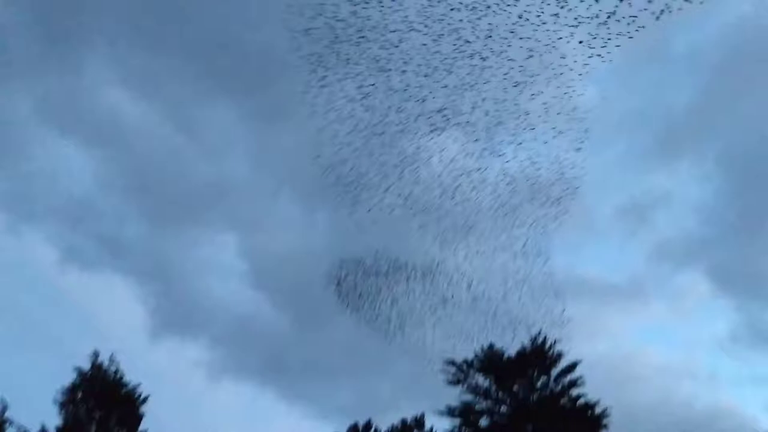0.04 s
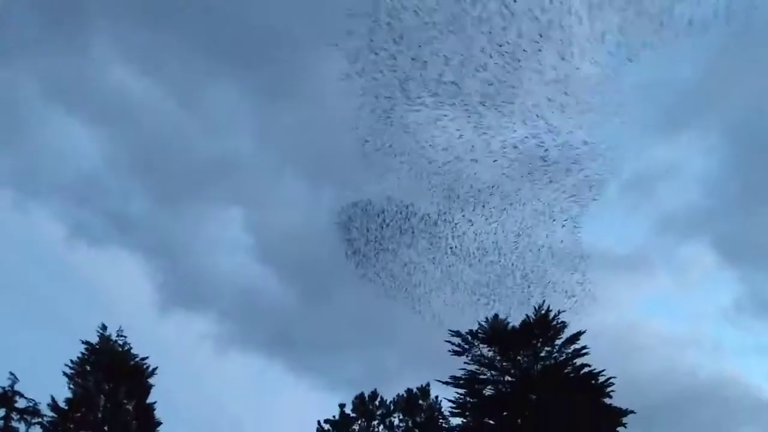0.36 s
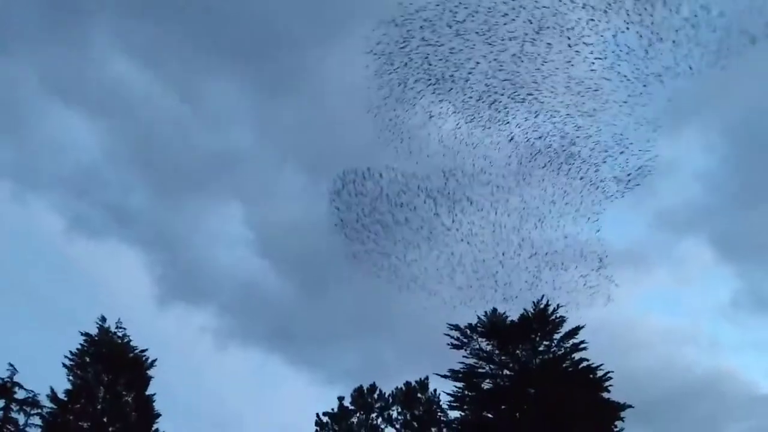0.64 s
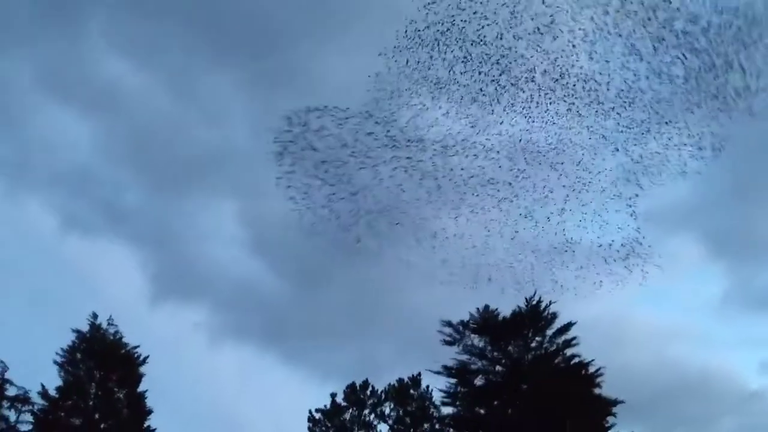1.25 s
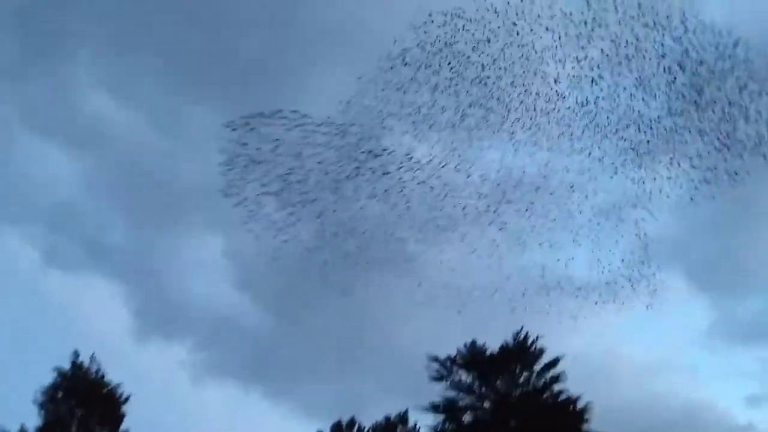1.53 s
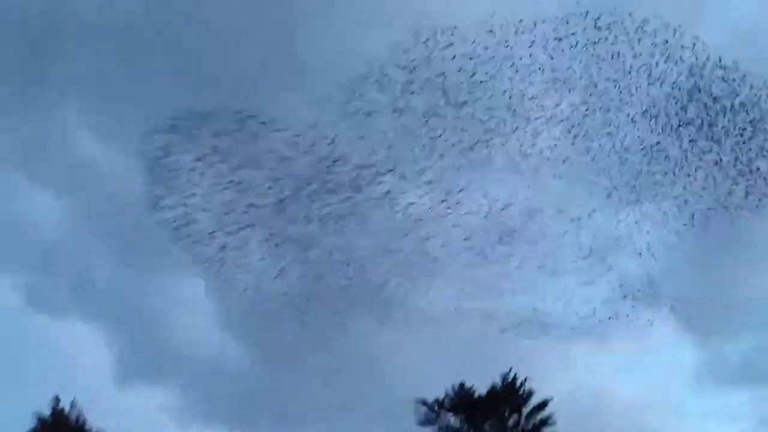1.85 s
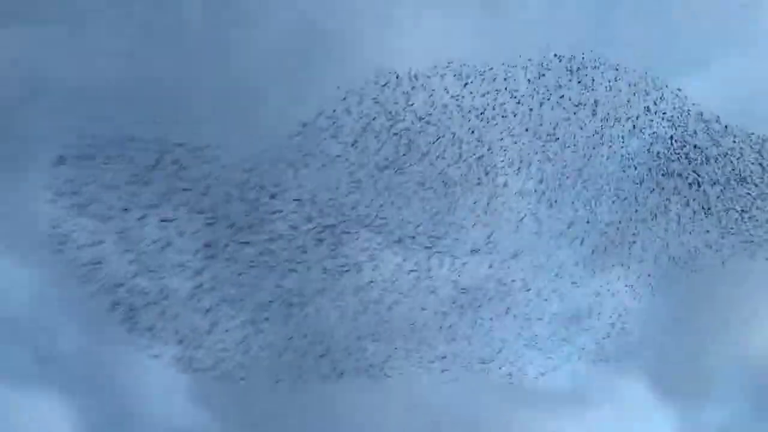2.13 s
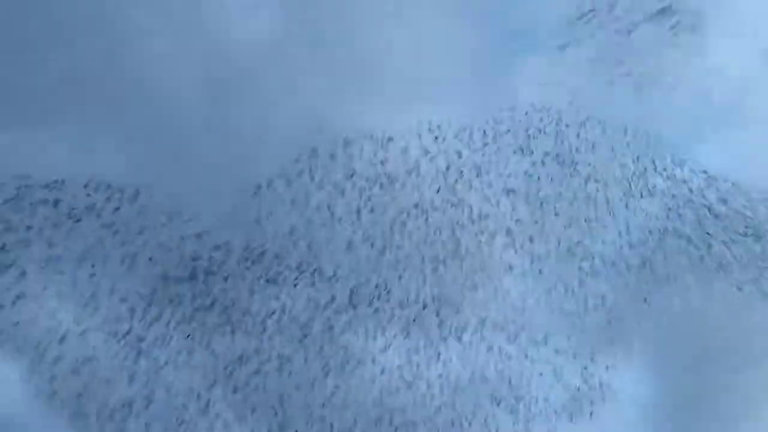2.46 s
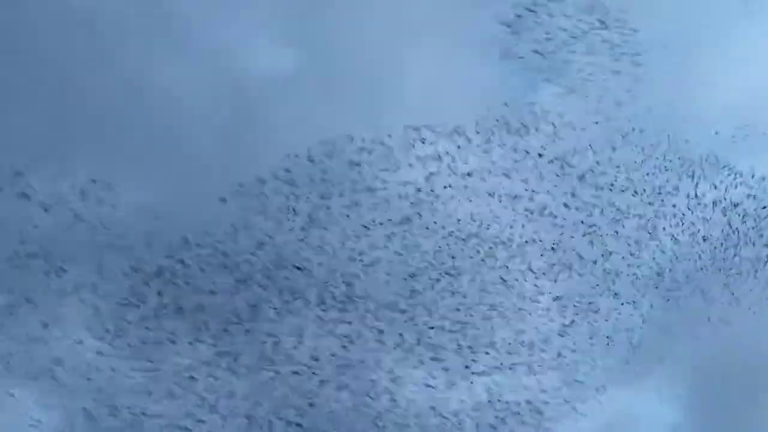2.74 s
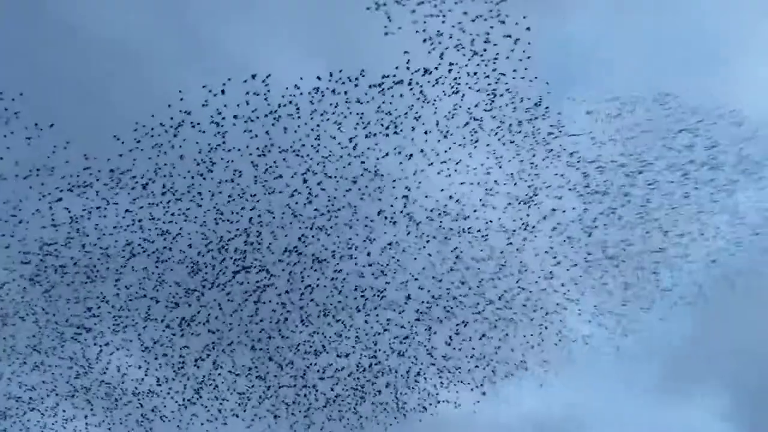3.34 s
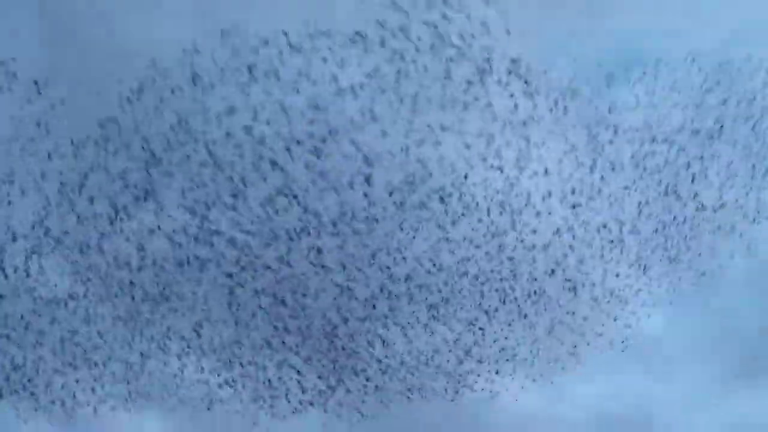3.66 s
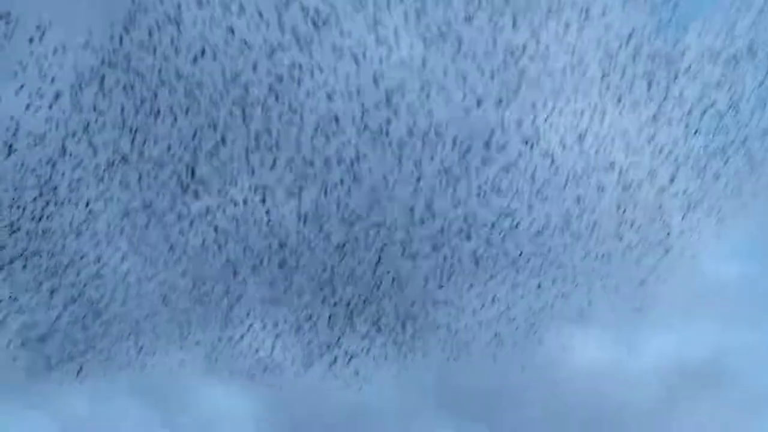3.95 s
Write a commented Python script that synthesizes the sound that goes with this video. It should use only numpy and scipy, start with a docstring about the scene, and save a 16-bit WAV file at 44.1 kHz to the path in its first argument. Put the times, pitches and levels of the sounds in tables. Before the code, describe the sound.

A rush of thousands of bird wings starts faint outdoors, with brief hollow swishes, then swells overhead. Short gusts of wind buffet the microphone, and later a few faint, high whistles echo off the trees.

```python
"""After a moment of silence a faint hiss fades up, and a huge flock of starlings wheels overhead at dusk.
Wind starts to buffet the microphone in short gusts and thumps, while brief hollow swishes come and go.
From about 1.5 s the rush of thousands of wings swells and brightens as the flock nears.
Just after 2 s, and again after 3 s, a few thin whistled calls echo off the trees. Throughout, the left
channel is nearly the right one turned upside down and a fraction of a millisecond late."""
import sys
import numpy as np
from scipy import signal
from scipy.fft import rfft, irfft
from scipy.io import wavfile
from scipy.ndimage import uniform_filter1d

SR = 44100
rng = np.random.default_rng(int(sys.argv[2]) if len(sys.argv) > 2 else 0)


def persist_wave(psi):
    """Save psi, clipped to +-1, as 16-bit WAV."""
    counts = np.round(np.clip(psi, -1, 1) * 32767).astype(np.int16)
    wavfile.write(sys.argv[1], SR, np.atleast_2d(counts).T)


N = 176400
TIME = np.arange(N) / SR
START_S = 0.162
SOUND_LAG_S, WIND_LAG_S = 0.000435, 0.000455  # how late the left channel is


def flock():
    """Thousands of wings merge into a rush; its treble comes in waves and reaches higher as they near."""
    # Tone of the low body and of the treble of the rush: (frequency [Hz], relative level [dB])
    body_tone = [(150, -0.5), (330, 5.5), (480, 1.5), (640, -2), (830, 2), (1030, -6), (1200, -18),
                 (1450, -24)]
    treble_tone = [(1000, -21), (1180, -4), (1370, -1.5), (1540, -3), (1680, -10.5), (1850, -3.5),
                   (2100, -41)]
    # Loudness of the body: (time [s], level [dB])
    body_swell = [(0.2, -63), (0.5, -52.5), (1.0, -56), (1.53, -53.5), (1.64, -45.5), (1.77, -43),
                  (1.86, -43.5), (2.0, -43), (2.13, -38.5), (2.38, -36.5), (2.68, -41), (2.8, -38),
                  (2.98, -43.5), (3.12, -37.5), (3.4, -39.5), (3.62, -37), (3.76, -38.5), (4.0, -34)]
    # Waves of treble: (time [s], level [dB], upper edge of the whole rush [Hz])
    treble_swell = [(1.5, -76, 1220), (1.78, -61, 1540), (1.9, -56, 1320), (2.0, -47.5, 1100),
                    (2.13, -50, 1390), (2.35, -59.5, 1270), (2.42, -50.5, 1393), (2.6, -55, 1620),
                    (2.75, -49.5, 1280), (2.85, -50, 1733), (2.98, -60, 1460), (3.04, -52.5, 1750),
                    (3.1, -64, 1360), (3.2, -57.5, 1620), (3.3, -57.5, 1530), (3.5, -51.5, 1600),
                    (3.72, -48.5, 1600), (3.9, -48.5, 1604)]
    treble_db, edge_hz = in_time(treble_swell)
    body = from_db(in_time(body_swell)[0]) * wings(body_tone, edge_hz, flutter_db=3.5)
    treble = from_db(treble_db) * wings(treble_tone, edge_hz, flutter_db=5)
    flicker = from_db(0.66 * drift(170))
    return stereo((body + treble) * flicker)


def wings(tone, edge_hz, flutter_db, wingbeats_per_s=8.2, fade_db_per_hz=0.12):
    """Bands of swishing air each flutter at about the wingbeat rate, and fade above the upper edge."""
    borders_hz = np.linspace(130, 2100, 26)
    air = [noise(tone), noise(tone)]
    full, faded = 0, 0
    for k, band in enumerate(zip(borders_hz, borders_hz[1:])):
        swish = signal.sosfilt(signal.butter(2, band, "band", fs=SR, output="sos"), air[k % 2])
        swish *= from_db(flutter_db * np.clip(drift(wingbeats_per_s), -2, 2))
        full += swish
        faded += swish * from_db(-fade_db_per_hz * np.maximum(np.mean(band) - edge_hz, 0))
    return faded / np.std(full)


def swishes(waver_hz=48):
    """Short hollow swishes of unsteady pitch stand out of the rush."""
    # One swish a row: (middle [s], half-length [s], pitch [Hz], level [dB])
    swells = [(0.257, 0.018, 850, -57), (0.441, 0.0073, 705, -52.5), (0.528, 0.0087, 825, -53),
              (0.571, 0.0072, 596, -42), (0.782, .017, 620, -48.5), (0.861, 0.0079, 795, -48),
              (0.901, 0.0052, 594, -45.5), (0.918, 0.012, 820, -48.5), (0.951, 0.017, 415, -38),
              (1.015, 0.016, 455, -44.5), (1.071, 0.0095, 1028, -56.5), (1.11, 0.012, 1075, -55),
              (1.136, 0.011, 889, -57), (1.308, .017, 1030, -54.5), (1.375, 0.043, 847, -57.5),
              (1.441, 0.014, 904, -51), (1.527, 0.014, 753, -47.5), (1.638, 0.04, 810, -49),
              (1.725, .028, 921, -43), (1.78, 0.021, 906, -41.5), (1.888, 0.032, 1293, -57),
              (1.98, 0.018, 1078, -50), (2.115, 0.015, 850, -41), (2.36, .04, 870, -40),
              (3.117, 0.0044, 950, -37), (3.621, .009, 888, -37.5)]
    waver = waver_hz * drift(90)
    out = np.zeros(N)
    for s, width, hz, db in swells:
        swell = from_db(db) * np.exp(-((TIME - s) / width) ** 2)
        out += swell * sine(hz + waver)
    return stereo(out)


def wind(lumps_db=2.5, lumps_per_s=39, apart_db=-14.5):
    """An uneven breeze rumbles on the microphone, with short gusts riding on it."""
    # Strength of the breeze: (time [s], level [dB])
    breeze_levels = [(0.2, -50), (0.42, -43), (0.7, -32), (0.82, -39), (1.04, -39.5), (1.19, -34.5),
                     (1.35, -41), (1.52, -30.5), (1.7, -28.5), (1.9, -32), (2.15, -28), (2.42, -31.5),
                     (2.59, -32), (2.68, -40.5), (2.76, -33.5), (2.85, -30.5), (2.94, -34.5), (3.1, -28),
                     (3.25, -30), (3.55, -31.5), (3.76, -34), (4.0, -36)]
    # One gust a row: (middle [s], half-length [s], level [dB])
    gust_list = [(0.268, 0.014, -35.5), (0.358, 0.036, -36.5), (0.489, 0.03, -21.5), (0.553, 0.032, -19),
                 (0.636, 0.03, -23.5), (0.725, 0.028, -28), (0.852, 0.023, -34), (0.929, 0.025, -26.5),
                 (0.994, 0.0096, -33), (1.263, 0.012, -28.5), (1.3, 0.024, -29.5), (1.385, 0.014, -29),
                 (1.438, 0.016, -28.5), (1.622, 0.04, -26), (1.727, 0.034, -29), (1.795, 0.048, -24),
                 (1.936, 0.042, -23.5), (2.224, 0.014, -16.5), (2.328, 0.076, -21), (2.494, 0.031, -24.5),
                 (2.747, 0.01, -21.5), (3.037, 0.061, -21.5), (3.435, 0.036, -25.5), (3.53, 0.044, -26),
                 (3.637, 0.049, -26), (3.905, 0.029, -25.5)]
    breeze = from_db(in_time(breeze_levels)[0] + lumps_db * drift(lumps_per_s))
    gusts = sum(from_db(db) * np.exp(-2 * ((TIME - s) / width) ** 2) for s, width, db in gust_list)
    apart = from_db(apart_db) * np.array([rumble(), rumble()])  # each channel's own share
    return np.hypot(breeze, gusts) * (stereo(rumble(), WIND_LAG_S) + apart)


def rumble():
    """Swirling air makes a low rumble, held here at an even strength."""
    # Tone of the wind: (frequency [Hz], relative level [dB])
    wind_tone = [(20, -32), (42, -41), (62, -5), (120, 6.5), (200, -1.5), (310, -7.5), (430, -19),
                 (600, -28.5), (900, -40.5), (1500, -71)]
    swirl = noise(wind_tone)
    return swirl / np.sqrt(uniform_filter1d(swirl ** 2, size=1300) + 1e-20)


def thumps(width_cycles=0.29, low_cut_hz=42):
    """Each swirl of air that hits the microphone is one quick swing of pressure."""
    # One swirl a row: (time [s], level [dB], pitch [Hz])
    swirls = [(0.206, -22, 188), (0.47, -26, 230), (0.486, -12, 115), (0.504, -10, 184), (0.525, -16, 240),
              (0.534, -9, 180), (0.555, -10.5, 197), (0.566, -25, 287), (0.843, -23, 140),
              (0.928, -20, 192), (1.001, -23, 187), (1.292, -14.5, 157), (1.429, -24, 248),
              (1.777, -16, 210), (1.787, -11.5, 254), (1.93, -8.5, 122), (1.965, -6.5, 132),
              (2.163, -14, 225), (2.216, -13, 258), (2.288, -8.5, 168), (2.315, -11, 152),
              (2.348, -11.5, 196), (2.485, -12.5, 128), (3.008, -11.5, 320), (3.035, -8, 195),
              (3.326, -21, 172), (3.522, -21, 223), (3.658, -9.5, 132)]
    out = np.zeros(N)
    for (s, db, hz), phase in zip(swirls, rng.random(len(swirls))):
        cycles = (TIME - s) * hz
        near = np.abs(cycles) < 10
        swing = np.sin(2 * np.pi * (cycles[near] + phase))
        out[near] += from_db(db) * swing / np.cosh(cycles[near] / width_cycles)
    low_cut = signal.butter(2, low_cut_hz, "high", fs=SR, output="sos")
    return stereo(signal.sosfilt(low_cut, out), WIND_LAG_S)


def tick(at_s=1.967, peak_db=-32, top_hz=1810):
    """A faint, dull click sits on the hardest thump."""
    return stereo(from_db(peak_db) * np.exp(-(np.pi * top_hz * (TIME - at_s)) ** 2))


def calls(rasp_db=3, echo_s=0.26, around_db=-10):
    """Slightly raspy whistles slide down quickly, then settle; the trees scatter them into an echo."""
    # Whistles: (start [s], length [s], first pitch [Hz], last pitch [Hz], level [dB], waver [fraction])
    notes = [(2.151, 0.03, 3560, 3500, -59, 0.013), (2.179, 0.048, 4060, 3972, -49.5, .008),
             (2.243, 0.065, 4020, 3950, -52.5, .007), (3.177, 0.057, 3640, 2980, -46.5, .026),
             (3.228, 0.053, 3615, 3530, -47, 0.005), (3.24, .05, 3100, 2990, -60, .025),
             (3.263, 0.045, 4660, 4120, -54.5, 0.02), (3.373, 0.034, 3220, 2995, -51, 0.03),
             (3.411, 0.057, 2700, 2545, -57.5, 0.02)]
    whistles = np.zeros(N)
    waver = np.clip(drift(170), -2, 2)
    for s, length, first_hz, last_hz, db, depth in notes:
        progress = np.clip((TIME - s) / length, 0, 1)
        slide_hz = last_hz + (first_hz - last_hz) * (1 - progress) ** 2
        whistles += from_db(db) * np.sin(np.pi * progress) * sine(slide_hz * (1 + depth * waver))
    whistles *= unit_strength(from_db(rasp_db * np.clip(drift(110), -2, 1)))
    tails = rng.standard_normal((2, SR)) * from_db(-60 * TIME[:SR] / echo_s)
    front, around = [signal.fftconvolve(whistles, tail / np.linalg.norm(tail))[:N] for tail in tails]
    heard = stereo(whistles + front) + from_db(around_db) * around
    return lean_right(heard, db=4)


def background(rise_s=0.11):
    """Faint hiss fades up at the start, the treble last, swells a little twice and leans to the right."""
    # Tone of the shared hiss, then of each channel's own: (frequency [Hz], level [dB per Hz])
    shared_tone = [(700, -102), (1500, -102), (2200, -104), (3500, -107), (5000, -112), (8000, -120),
                   (15000, -130)]
    own_tone = [(1000, -130), (2400, -135), (3300, -116), (5500, -112), (8000, -113), (11000, -116),
                (15000, -120)]
    # Swells of each channel's own hiss: (time [s], gain [dB])
    own_swell = [(0.17, -13), (0.25, -7), (0.29, -10), (0.36, -1.5), (0.41, -6), (0.48, 1.5), (0.6, -2),
                 (1.85, -1.2), (2.0, 0.5), (2.2, -0.7), (4.0, -0.9)]
    fade_in = 1 - np.exp(-np.maximum(TIME - START_S, 0) / rise_s)
    shared = fade_in * stereo(noise(shared_tone))
    own = from_db(in_time(own_swell)[0]) * np.array([noise(own_tone), noise(own_tone)])
    return shared + lean_right(own, db=1.5)


def suppressor(sound, shut_db=-6, hold_s=0.0068, size=1024):
    """A noise suppressor turns each narrow band down while it is weak, so faint parts burble."""
    # Level below which a band is turned down: (frequency [Hz], level [dB per Hz])
    threshold = [(100, -79), (400, -76.5), (800, -78.5), (1600, -89)]
    hop = size // 4
    frames = dict(fs=SR, nperseg=size, noverlap=size - hop, scaling="psd")
    hz, _, bands = signal.stft(sound, **frames)
    power = 2 * np.mean(np.abs(bands) ** 2, axis=0)
    memory = np.exp(-hop / SR / hold_s)
    held_power = signal.lfilter([1 - memory], [1, -memory], power)
    excess = (held_power / from_db(at_hz(threshold, hz))[:, None] ** 2) ** 2
    gain = np.maximum(excess / (1 + excess), from_db(shut_db))
    return signal.istft(bands * gain, **frames)[1][:, :N]


def stereo(sound, lag_s=SOUND_LAG_S):
    """The left channel is the right one upside down and slightly late."""
    delay = np.exp(-2j * np.pi * np.fft.rfftfreq(N, 1 / SR) * lag_s)
    return np.array([-irfft(rfft(sound) * delay, N), sound])


def lean_right(pair, db):
    """Tip the balance to the right by this many decibels."""
    return pair * from_db([[-db / 2], [db / 2]])


def noise(tone):
    """Steady noise shaped by rows of (frequency [Hz], level [dB per Hz])."""
    gain = from_db(at_hz(tone, np.fft.rfftfreq(N, 1 / SR)))
    return irfft(rfft(rng.standard_normal(N)) * gain, N) * np.sqrt(SR / 2)


def drift(rate_hz, step=40):
    """A smooth random wobble of typical size 1, mostly slower than the given rate."""
    memory = np.exp(-2 * np.pi * rate_hz * step / SR)
    kicks = rng.standard_normal(N // step + 2002)
    slow = signal.lfilter([1], [1, -2 * memory, memory ** 2], kicks)[2000:]  # once it has settled
    return np.interp(np.arange(N) / step, np.arange(len(slow)), unit_strength(slow))


def sine(hz):
    """A pure tone that follows a changing pitch."""
    return np.sin(2 * np.pi * np.cumsum(hz) / SR)


def in_time(rows):
    """Join timed rows by straight lines, giving one curve for each column after the time."""
    times, *columns = np.transpose(rows)
    return [np.interp(TIME, times, column) for column in columns]


def at_hz(rows, hz):
    """Read levels between the listed frequencies, with octaves evenly spaced."""
    listed_hz, levels = np.transpose(rows)
    return np.interp(np.log(np.maximum(hz, 1)), np.log(listed_hz), levels)


def from_db(db):
    """Turn decibels into a multiplier."""
    return 10 ** (np.asarray(db) / 20)


def unit_strength(x):
    """Scale a signal to an average power of 1."""
    return x / np.sqrt(np.mean(x ** 2) + 1e-20)


def scene():
    """Flock and wind pass through the suppressor; thumps, tick, swishes and calls lie over the hiss."""
    return suppressor(flock() + wind()) + thumps() + tick() + swishes() + calls() + background()


def record(dry, open_s=0.021, cutoff_hz=15200):
    """The sound opens after a moment of silence, and the highest treble is cut away."""
    opened = dry * np.clip((TIME - START_S) / open_s, 0, 1) ** 2
    return signal.sosfilt(signal.ellip(10, 0.1, 70, cutoff_hz, fs=SR, output="sos"), opened)


dry = scene()
out = record(dry)
persist_wave(out)
```